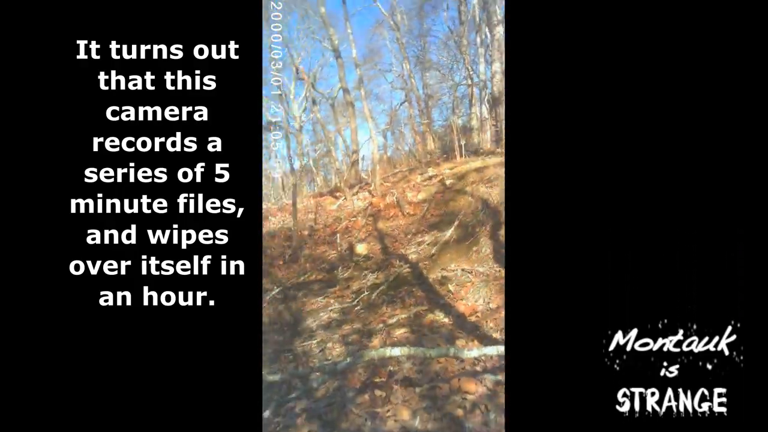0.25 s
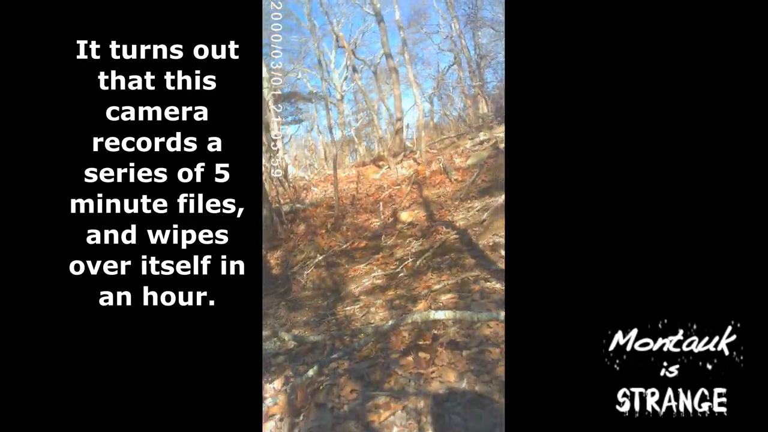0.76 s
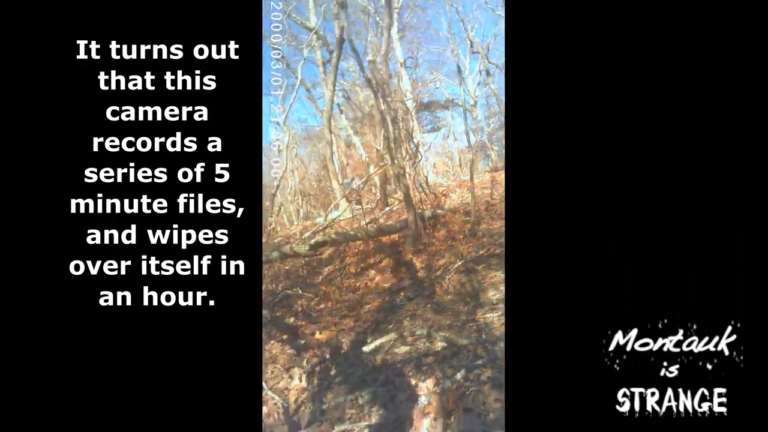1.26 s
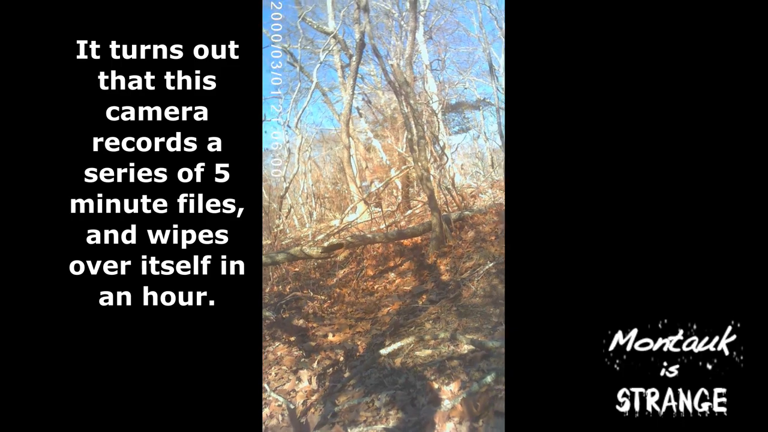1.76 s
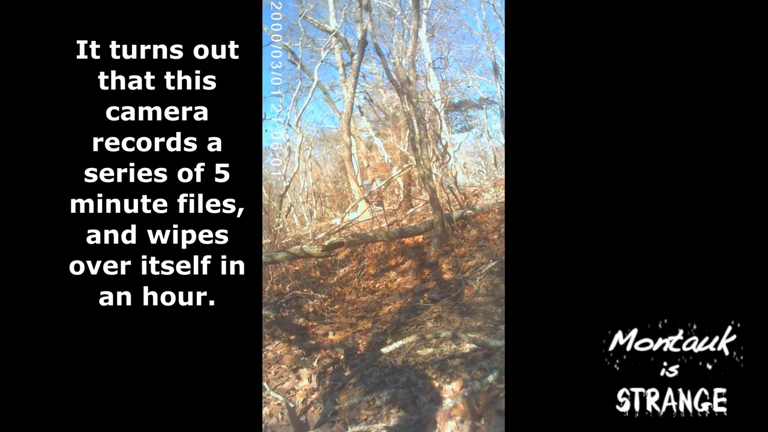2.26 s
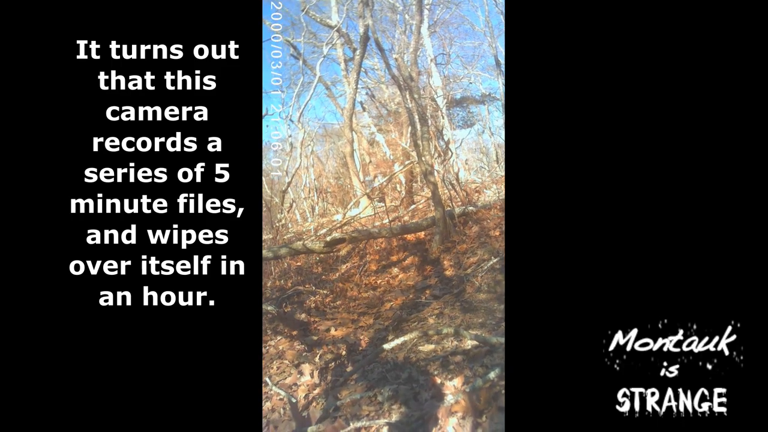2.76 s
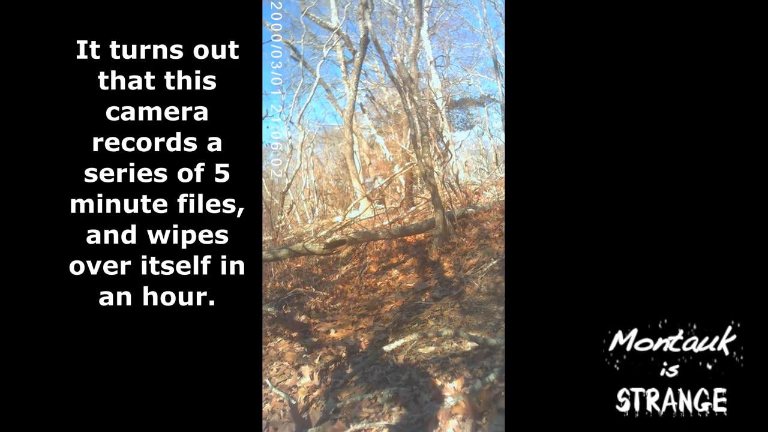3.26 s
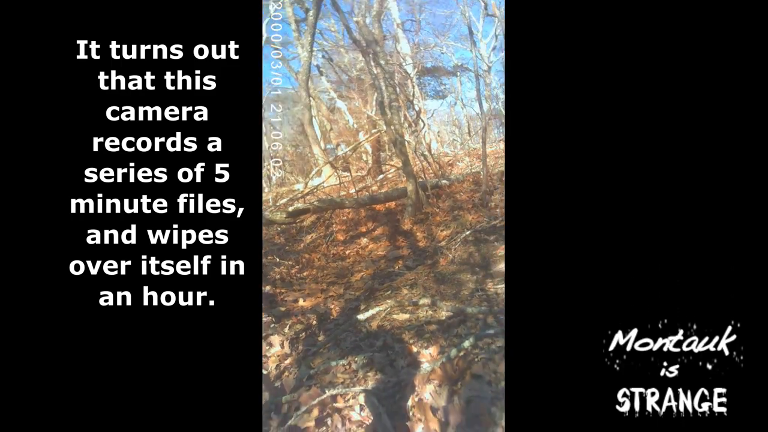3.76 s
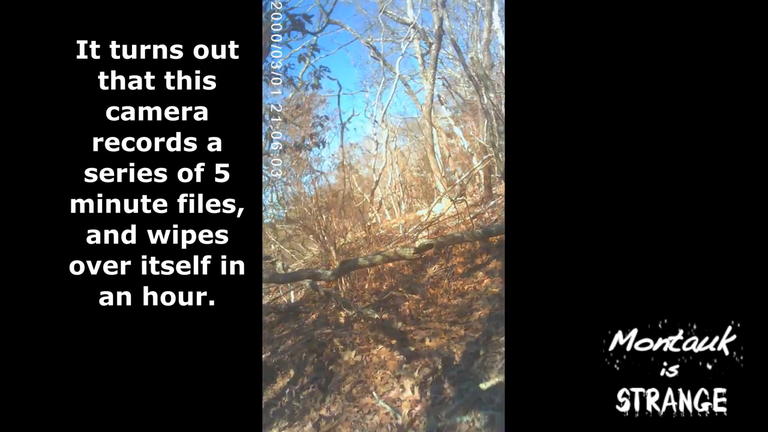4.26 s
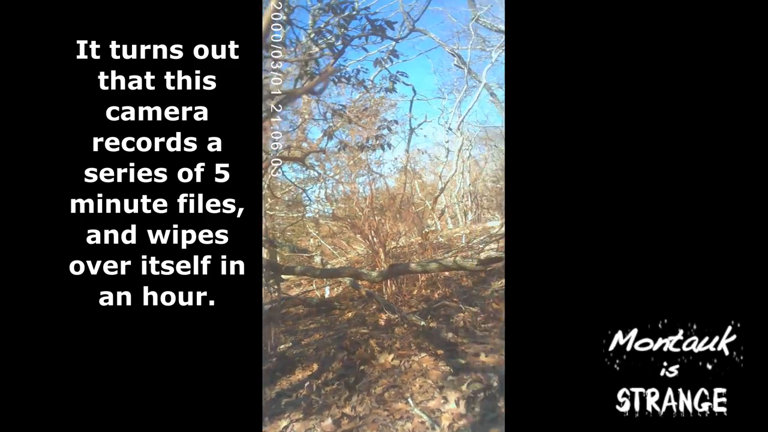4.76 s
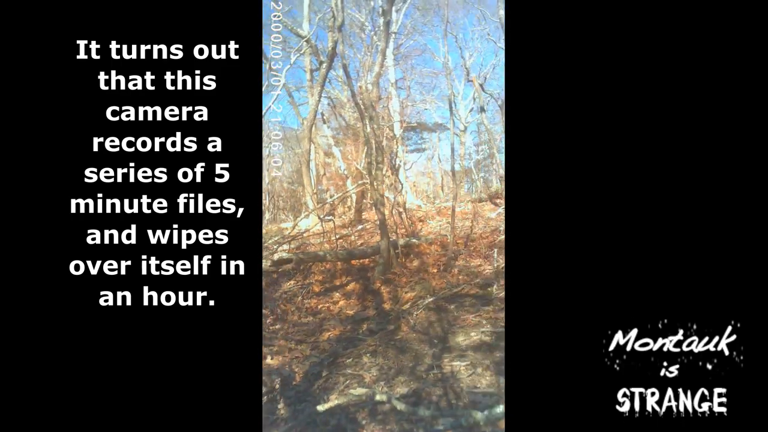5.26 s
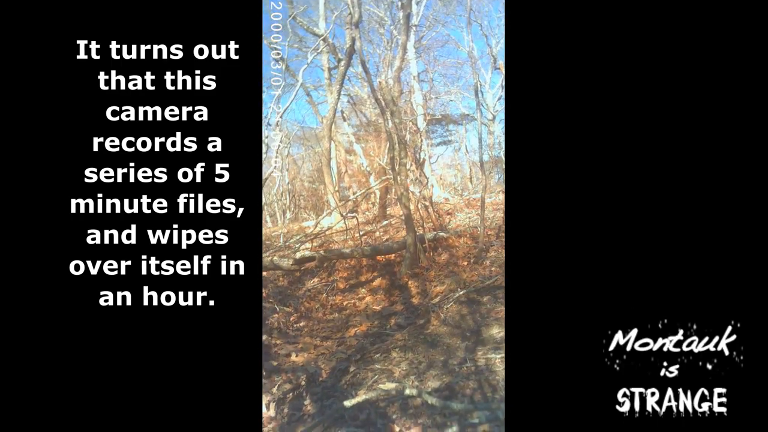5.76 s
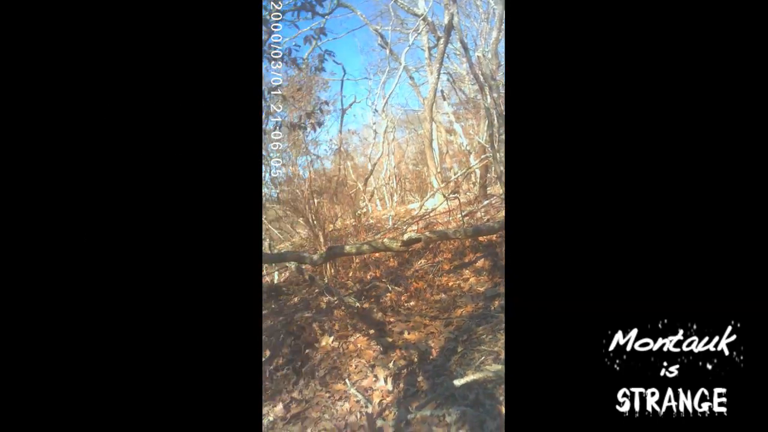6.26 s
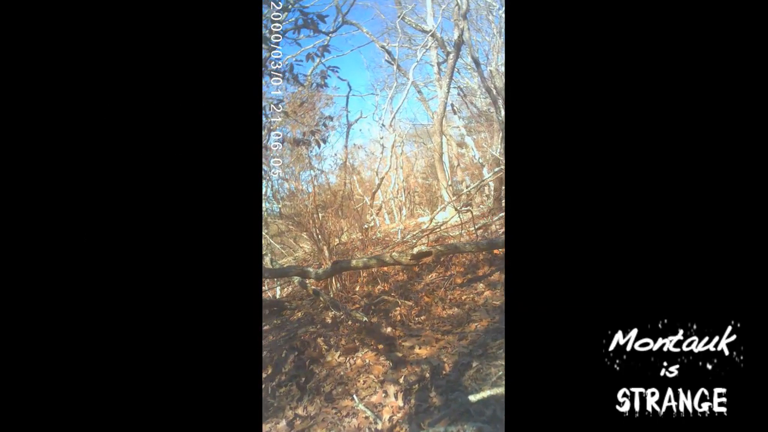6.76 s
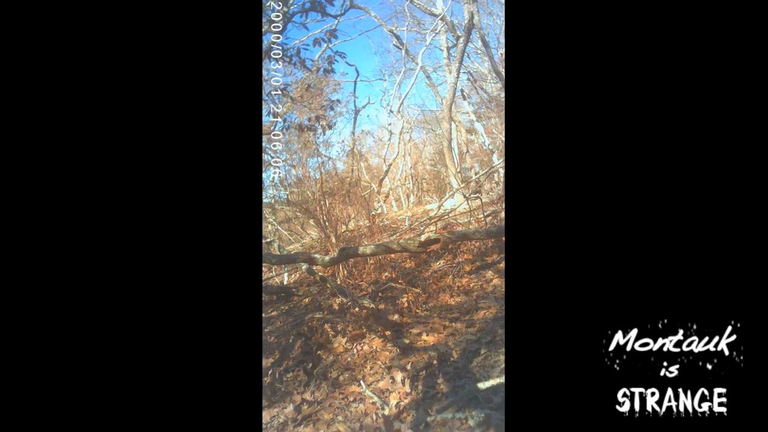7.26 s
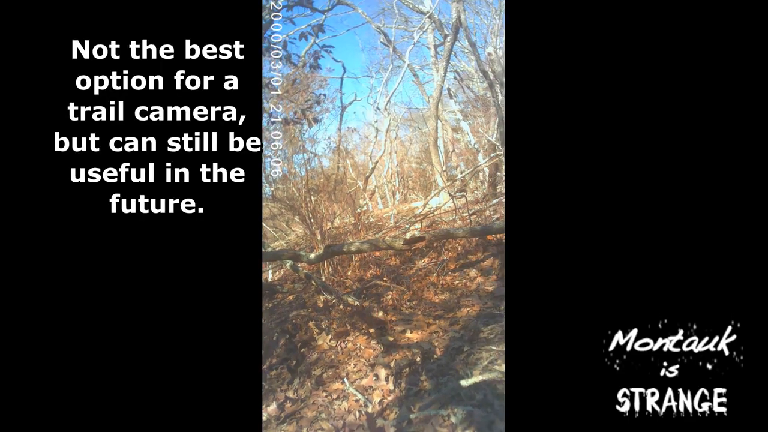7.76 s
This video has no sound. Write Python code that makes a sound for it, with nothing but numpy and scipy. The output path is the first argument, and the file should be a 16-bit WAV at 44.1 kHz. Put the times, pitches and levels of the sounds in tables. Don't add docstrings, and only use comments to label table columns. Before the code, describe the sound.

Close, brittle snaps and leaf rustling on a plastic case thin out, surge into one dense crunch with thuds, then fade to sparse soft rustles.

```python
import sys
import numpy as np
from scipy import signal
from scipy.fft import rfft, irfft, next_fast_len
from scipy.io import wavfile
from scipy.ndimage import uniform_filter1d, map_coordinates

SR = 44100
rng = np.random.default_rng(int(sys.argv[2]) if len(sys.argv) > 2 else 0)


def persist_wave(psi):
    counts = np.round(np.clip(psi, -1, 1) * 32767).astype(np.int16)
    wavfile.write(sys.argv[1], SR, np.atleast_2d(counts).T)


def undo_db(level):
    steps = np.asarray(level, float) / 20
    return 10 ** steps


N = 353549

# centre in Hz, width in Hz, level in dB.
SHELL = [(297.3, 210, 1.5), (640, 724, 1), (857, 250, 0.5), (1350, 910, -1.5)]
FACE = [(2620, 716, 0), (2940, 360, 4.5), (3455, 420, 0), (4284, 730, -4)]
PORT = [(5290, 690, 3), (6495, 1300, -1.5), (6110, 650, -13)]
# time in seconds, pressure in dB, flexing of the shell's top mode in dB.
CRUNCH = [
    (3.788, -48.5, 10),
    (3.825, -35, 9.5),
    (3.93, -27, 4.5),
    (4.04, -23.5, -24.5),
    (4.17, -29, -17.5),
    (4.228, -33, -13),
    (4.236, -40.5, -3),
    (4.33, -53.5, -13),
    (4.38, -59, 7.5),
]


def unit(x):
    return x / np.sqrt(np.mean(x ** 2) + 1e-20)


def along(points, hz):
    f, v = np.transpose(points)
    return np.interp(np.log(hz + 1), np.log(f + 1), v)


def curves(rows):
    s, *cols = np.transpose(rows)
    return [np.interp(np.arange(N) / SR, s, c) for c in cols]


def wobble(rate):
    knots = rng.standard_normal(int(N * rate / SR) + 4)
    return map_coordinates(knots, [np.arange(N) * rate / SR])


def filtered(x, response):
    n = x.shape[-1]
    m = 2 * next_fast_len(n // 2 + 2048)
    return irfft(rfft(x, m) * response(np.fft.rfftfreq(m, 1 / SR)), m)[..., :n]


def placed(s, sounds):
    where = np.round(s * SR).astype(int)[:, None] + np.arange(sounds.shape[1])
    return np.bincount(where.ravel(), sounds.ravel(), N + sounds.shape[1])[:N]


def ring(modes, spread=None):
    sign = -1 if spread is None else 1

    def response(f):
        skirt = (1j * f / modes[0][0]) / (1 + 1j * f / modes[0][0])
        total = 0
        for k, (centre, width, db) in enumerate(modes):
            gain = undo_db(db if spread is None else db + spread[:, k:k + 1])
            mode = 1j * f * width / (centre * centre - f * f + 1j * f * width)
            total = total + sign ** k * gain * mode
        return skirt * total
    return response


def excited(force, modes):
    response = ring(modes)
    power = np.abs(response(np.linspace(0, SR / 2, num=2048))) ** 2
    return filtered(force, response) / np.sqrt(np.mean(power))


def causal(points):
    def response(f):
        fold = irfft(np.log(undo_db(along(points, f))))
        fold[1:len(f) - 1] *= 2
        fold[len(f):] = 0
        return np.exp(rfft(fold))
    return response


def woods():
    # frequency in Hz, spectral density in dB per Hz.
    hum = [(15, -29), (25, 0.5), (233, -2), (1680, -14.5), (3110, -14.5), (6350, -19), (7320, -31),
           (9520, -48), (16100, -120)]
    return undo_db(-70.0) * unit(filtered(rng.standard_normal(N), lambda hz: undo_db(along(hum, hz))))


def grip():
    # time in seconds, level in dB.
    weight = [(.55, -60.5), (.85, -77), (1.1, -55), (1.8, -71), (2.4, -84.5), (3.2, -86), (3.3, -69),
              (3.7, -65.5), (4.1, -56), (4.4, -64), (5.1, -71), (5.5, -67.5), (5.9, -77.5), (6.3, -71.5),
              (6.7, -74.5), (7.2, -74), (7.65, -74.5), (7.8, -71.5)]
    # frequency in Hz, density in dB per Hz.
    thud = [(20, -19), (45, -6.5), (90, -4.5), (160, -4.5), (300, -12), (700, -36)]
    # time in seconds, peak in dB.
    bump_rows = [(0.135, -42), (0.307, -45), (0.348, -37), (0.457, -46.5), (0.916, -58), (1.085, -51),
                 (1.136, -32), (1.268, -33.5), (1.359, -39.5), (3.497, -41.5), (3.827, -39), (3.912, -44),
                 (3.977, -49), (4.038, -34), (4.075, -19.5), (4.106, -28), (4.242, -37.5), (4.3085, -39.5),
                 (3.271, -59), (5.26, -49), (5.503, -54), (7.849, -56), (7.961, -69), (6.344, -56),
                 (6.998, -57), (.7, -48.5), (7.2, -52), (4.999, -61.5), (7.445, -49.5)]
    (level_db,) = curves(weight)
    rumble = unit(filtered(rng.standard_normal(N), lambda hz: undo_db(along(thud, hz))))
    s, db = np.transpose(bump_rows)
    t = np.arange(4096) / SR
    fade = undo_db(db[:, None] - 60 * t / 0.096) * (1 - np.exp(-t / 0.0015))
    bounce_hz = 95 * undo_db(1.5 * rng.standard_normal((len(s), 1)))
    bumps = placed(s, undo_db(-2.0) * fade * np.sin(2 * np.pi * bounce_hz * t))
    lumps = undo_db(level_db + 3.5 * wobble(14))
    return rumble * (lumps + undo_db(-2.5) * placed(s, fade)) + bumps


def catches():
    # middle in seconds, pitch in Hz, peak in dB.
    tones = [(0.1385, 3020, -27.5), (0.205, 1440, -43), (0.206, 583, -43), (0.224, 1400, -51),
             (0.254, 1500, -42.5), (0.353, 1590, -35.5), (0.375, 2790, -27.5), (0.389, 1360, -43),
             (0.556, 5940, -40), (0.558, 2970, -36), (0.68, 5560, -31), (0.686, 2930, -31.5),
             (1.012, 1400, -54), (1.061, 1370, -39), (1.105, 2960, -30), (1.235, 1526, -56),
             (1.2735, 886, -21), (1.2805, 6750, -21), (1.449, 5500, -44), (2.069, 3030, -46.5),
             (3.818, 5970, -42), (3.829, 1300, -50), (3.915, 3790, -28), (3.931, 1280, -30.5),
             (3.959, 1300, -31), (3.976, 4000, -25), (4.013, 870, -30.5), (4.054, 857, -23),
             (4.156, 3830, -34.5), (4.173, 3060, -21.5), (4.194, 880, -31.5), (4.227, 2320, -31),
             (4.526, 1120, -66), (4.529, 2870, -47), (4.553, 2970, -44), (4.611, 2950, -58),
             (4.655, 1280, -57), (4.75, 3050, -52.5), (4.906, 1060, -61), (4.976, 4150, -50),
             (5.507, 2960, -49.5), (5.553, 3000, -57), (5.576, 4400, -56), (5.679, 3230, -53.5),
             (5.944, 2960, -57), (6.042, 1300, -53), (6.168, 2430, -50.5), (6.167, 3170, -49),
             (6.571, 1270, -57), (6.591, 1270, -56.5), (7.275, 1253, -61), (7.293, 1150, -65),
             (7.303, 3000, -53), (7.304, 5470, -49.5), (7.492, 6980, -46), (7.946, 2970, -56)]
    rise_s, fall_s = 0.002, 0.0046
    phase_wander = 0.076
    s, hz, db = np.transpose(tones)[:, :, None]
    t = np.arange(-1024, 1024) / SR
    wander = np.cumsum(rng.standard_normal((len(s), len(t))), axis=1)
    turn = 2 * np.pi * hz * t + phase_wander * wander
    lead = t + rise_s
    swell = np.exp(-.5 * (lead / np.where(lead < 0, rise_s, fall_s)) ** 2)
    return placed(s[:, 0] + t[0], undo_db(db) * swell * np.sin(turn))


def squeaks():
    # time in seconds, pitch in Hz, level in dB, upper partials over it in dB, time in seconds for the
    # fundamental to fall 40 dB.
    stems = [
        (4.972, 1018, -52.5, 7, 0.057),
        (5.15, 1065, -51.5, -4, 0.053),
    ]
    s, hz, db, upper_db, t60 = np.transpose(stems)[:, :, None]
    t = np.arange(4096) / SR
    wander = np.cumsum(rng.standard_normal((len(s), len(t))), axis=1)
    turn = 2 * np.pi * hz * t + 0.038 * wander
    stack = 0
    for k in (1, 2, 4, 5):
        partial_db = upper_db * (k > 1) - 5 * (k == 2) - 40 * t * np.sqrt(k) / t60
        stack = stack + undo_db(partial_db) * np.sin(k * turn)
    return placed(s[:, 0], undo_db(db) * stack * (1 - np.exp(-t / 0.0024)))


def blows():
    # time in seconds, peak in dB, knock and bright edge in dB over peak.
    twigs = [(.0074, -11, -14, 7), (0.135, -9, 3.5, -13.5), (0.2033, -17.5, -13, -18.5),
             (0.3079, 5.5, -22.5, -17.5), (0.3126, -10, 1.5, 4), (0.3502, -8.5, -26, 4),
             (0.357, -14.5, -29, 3.5), (0.372, -14.5, -29, -19), (0.5328, -14.5, -38, 5.5),
             (0.9323, -22, -5.5, 7.5), (1.0751, -16.5, -1.5, -17.5), (1.137, -8, -0.5, -6),
             (1.1484, -15, -2, 10), (1.2717, 1.5, 2, 2), (1.5974, -21, -20, 1), (3.502, -4, -12.5, 4.5),
             (4.044, -12, -9, 10.5), (4.079, -16.5, 6, -13.5), (4.085, -0.5, 3, 14),
             (4.1183, -12.5, 1, 13.5), (4.131, -17.5, -11, -9), (4.251, -14, -23, 7), (4.26, -13, -26, 4.5),
             (4.2752, -15.5, -31, 7), (4.3182, -21.5, -25, 9.5), (4.4273, -19.5, -24, -9),
             (5.293, -21, -8.5, -1.5), (6.421, -39, 14.5, -23), (7.458, -24, -41, 12),
             (7.4914, -20.5, -15.5, -4)]
    # time in seconds, peak in dB.
    ticks = [(.0738, -24.5), (.0857, -21.5), (.1078, -30), (.1581, -31.5), (.246, -15.5), (.4541, -20.5),
             (.4894, -22.5), (.7017, -21.5), (.962, -30.5), (1.173, -23.5), (1.3254, -19.5),
             (1.5682, -26.5), (1.658, -25), (1.6669, -24.5), (1.7702, -25.5), (1.8258, -26.5),
             (1.9307, -28.5), (2.3073, -29.5), (2.7754, -36.5), (3.3007, -29), (4.2813, -19), (4.3233, -23),
             (4.499, -25), (4.8422, -29.5), (6.4782, -30), (7.089, -37.5), (7.3305, -28), (6.1748, -34.5),
             (.5295, -30), (7.137, -40.5)]
    cracks = [(.0273, -22.5), (.0432, -24), (.0964, -23), (.458, -22.5), (1.0094, -38.5), (1.216, -33),
              (1.3525, -19.5), (1.41, -20.5), (1.4155, -24), (1.472, -24), (1.5021, -23), (1.544, -23.5),
              (1.6717, -27.5), (1.966, -32), (1.9948, -29.5), (2.1244, -31.5), (2.2114, -31), (2.3833, -29),
              (2.397, -30), (2.8568, -30.5), (3.4759, -20.5), (3.5701, -24), (3.6044, -23), (3.7026, -30),
              (3.7083, -29), (4.305, -21), (4.3906, -28), (4.67, -32.5), (6.0485, -25.5), (7.1216, -26.5)]
    taps = [(.4006, -25), (.73, -37), (.765, -41), (.9463, -38), (1.6756, -33), (1.1038, -35), (1.179, -22),
            (1.2083, -21), (1.3832, -26.5), (1.8005, -35.5), (1.946, -43), (2.0646, -41), (2.0837, -45),
            (2.109, -30.5), (2.52, -38), (2.889, -34), (3.3521, -33.5), (3.545, -42.5), (3.5887, -27.5),
            (3.667, -49), (4.414, -29.5), (4.4676, -36), (5.1503, -38), (5.228, -32.5), (5.5055, -35),
            (5.6554, -37), (6.0381, -36), (6.2917, -38.5), (6.9476, -38), (5.2985, -33.5)]
    knocks = [(.0165, -36), (.742, -49), (1.0274, -36), (1.3998, -37.5), (1.905, -53.5), (2.66, -52.5),
              (2.972, -47.5), (3.985, -22), (5.239, -45), (5.257, -47), (5.36, -47.5), (6.081, -44.5),
              (6.3443, -48.5), (7.42, -41.5), (7.53, -48)]
    # time in seconds, peak
    # in dB, bright edge in dB over peak.
    splinters = [(0.0317, -33, -11), (0.0592, -30, 3), (0.1415, -19, -4), (0.1745, -25, 3),
                 (0.2275, -34.5, 0), (0.271, -42, -1), (0.3416, -33, -1), (0.6262, -27, -2),
                 (0.7095, -56, -4), (0.7243, -40, -14), (0.7348, -49, -20), (0.8005, -44, -4),
                 (0.8672, -44, -4), (0.8899, -43, -13), (0.9176, -49, -15), (0.9732, -54, -3),
                 (1.0032, -43, 4), (1.051, -26, -14), (1.0868, -18.5, -19), (1.093, -19.5, -17),
                 (1.1203, -30.5, -12.5), (1.2627, -20, -1), (1.2867, -25.5, -2), (1.315, -41, 0),
                 (1.3621, -26, -2), (1.4242, -32.5, 7), (1.4695, -25, -9), (1.508, -34, -3),
                 (1.534, -25.5, -17), (1.5497, -24, -7), (1.604, -40, 8), (1.6885, -39, -13),
                 (1.7893, -39.5, -14), (1.988, -42, -11), (2.003, -36, -7), (2.006, -44, -9),
                 (2.0132, -50, -23), (2.022, -45, -5), (2.1017, -51.5, -12), (2.1469, -33, -11),
                 (2.183, -39, -12), (2.245, -46, -15), (2.25, -41, -11), (2.2681, -46, -3),
                 (2.285, -42, 10), (2.3347, -49, 21), (2.376, -34, -14), (2.5272, -36, -12),
                 (2.536, -39, -16),
                 (2.846, -41, -12), (2.852, -32.5, -23), (2.9487, -40.5, 3.5), (3.056, -46, -13.5),
                      (3.1577, -47, 11), (3.1914, -43.5, -2), (3.2158, -42, 0), (3.3378, -49, -15),
                      (3.3416, -37.5, -23), (3.3663, -40, -11), (3.428, -47, -15), (3.4508, -46, -5),
                      (3.4892, -20.5, -11), (3.4935, -16, 11), (3.6393, -35, -15), (3.6544, -45, -12),
                      (3.7413, -40, -10), (3.8443, -16.5, -14), (3.8564, -21.5, 12), (3.879, -21.5, -8),
                      (3.936, -12.5, -15), (3.9446, -21.5, -12), (3.9621, -9, -13), (3.9907, -16.5, -10),
                      (4.02, -13, -15), (4.047, -5, 0), (4.082, -8, 0), (4.094, -9.5, 6), (4.1052, -5.5, 8),
                      (4.115, -8.5, -3), (4.1282, -9.5, 4), (4.1398, -20.5, 9), (4.1481, -16, -7),
                      (4.1705, -19.5, -12), (4.287, -23.5, -11), (4.329, -27, 6), (4.345, -31.5, -4),
                      (4.4045, -29.5, -2), (4.457, -31.5, -7), (4.4948, -32, 6), (5.225, -52, -7.5),
                      (5.309, -51, -8), (5.315, -45, -5.5), (6.103, -70, 3.5), (6.122, -46, 6),
                      (6.1608, -43, -16), (6.2805, -41.5, -20.5), (6.449, -46, -13), (6.51, -45, -11),
                      (6.6845, -44.5, -5), (6.6956, -42, -18.5), (6.704, -45, -11.5), (6.9333, -40, -4.5),
                      (6.9565, -39.5, -1), (7.8143, -44, -14.5)]
    middle_s, gap_s, middle_db, sag_db = 7.6858, 0.027, -38.5, 2.5
    ratchet = [(middle_s + k * gap_s, middle_db - abs(k) * sag_db) for k in range(-2, 3)]
    # knock and bright edge, dB over peak
    kinds = [(ticks + ratchet, (-18.5, 2.5)), (cracks, (-5, 0)), (taps, (-1.5, -14)), (knocks, (13, -4))]
    rows = list(twigs)
    for kind, colour in kinds:
        rows += [(s, db, *colour) for s, db in kind]
    rows += [(s, db, -10, edge_db) for s, db, edge_db in splinters]
    return np.transpose(rows)


def stroked(rows):
    power = np.zeros(N)
    for s, length, first_db, slide_db in rows:
        way = np.arange(round(length * SR)) / (length * SR)
        part = power[round(s * SR):][:len(way)]
        part += undo_db(first_db + slide_db * way[:len(part)]) ** 2
    return power


def strokes():
    # start in seconds, length in seconds, first level in dB, slide in dB.
    brushes = [(0, 0.045, -39.5, -21.5), (0.054, 0.1, -48, -8), (0.135, 0.087, -36, -8.5),
               (0.225, 0.031, -43, 2.5), (0.33, 0.024, -56.5, 13.5), (0.369, 0.16, -40, -20),
               (0.45, 0.064, -43.5, 3), (.515, 0.059, -56.5, 13), (.546, 0.029, -40.5, -7),
               (.591, 0.039, -40.5, -12.5), (0.638, 0.058, -45, 11), (0.726, 0.018, -42, -32.5),
               (1.04, 0.01, -50.5, 7), (1.051, 0.045, -39.5, 5.5), (1.1, 0.0077, -31, 0.5),
               (1.13, 0.071, -52.5, -4.5), (1.207, 0.035, -36, -24), (1.25, 0.024, -53, 35),
               (1.2735, 0.0057, -14, -6.5), (1.284, 0.093, -48, 1.5), (1.385, 0.182, -50.5, -1.5),
               (1.612, 0.02, -60, 0.5), (1.7, 0.058, -56, 1.5), (1.76, 0.055, -60, -14),
               (1.819, 0.036, -44.5, -26), (1.999, 0.096, -62, -19), (2.058, 0.172, -54.5, -8.5),
               (2.23, 0.2, -60.5, 1), (3.49, 0.013, -33.5, 2.5), (3.502, 0.022, -30.5, -9.5),
               (3.524, 0.26, -50.5, -14.5)]
    slides = [(2.411, 0.085, -64.5, 0), (2.5, 0.11, -61, -13), (3.241, 0.056, -80, 4), (4.38, 0.2, -51, 1),
              (4.581, 0.074, -56, -34.5), (4.637, 0.12, -58.5, -2), (4.881, 0.048, -63, -4.5),
              (4.974, 0.0224, -50, -36.5), (5.08, 0.018, -70, -12), (5.187, 0.135, -66, -1.5),
              (5.397, 0.06, -56.5, -6.5), (5.491, 0.049, -55.5, -7), (5.548, 0.115, -55, -2),
              (5.66, 0.111, -57.5, -14.5), (5.818, 0.3, -66.5, 8), (6.138, 0.044, -62, 8),
              (6.202, 0.083, -68, 4), (6.322, 0.067, -62, -8), (6.453, 0.2, -62.5, -11),
              (6.553, 0.076, -55.5, -4), (6.664, 0.11, -59.5, -18.5), (6.764, 0.11, -62, -3.5),
              (6.898, .17, -65, 3.5), (7.126, 0.21, -63, 10), (7.339, 0.15, -62, 12),
              (7.477, 0.16, -58.5, -6), (7.947, 0.067, -62.5, -17.5)]
    # time in seconds, resting level, nearness to the port, weight on the shell in dB.
    contact = [(0, -58, -2, -5.5), (.4, -65, -5.5, -4), (.6, -56.5, -5, -14), (.75, -70.5, -4, -4),
               (1.05, -70, -5.5, -9), (1.25, -70.5, -7.5, 2.5), (1.5, -78.5, 2, -7.5),
               (1.9, -89.5, -6.5, -6), (2.6, -74.5, -0.5, -3.5), (3, -66.5, 0, -7.5),
               (3.78, -73.5, -5.5, -2.5), (3.9, -64, -4, -12.5), (4.1, -66.5, -5, 0), (4.8, -80, -11, -8),
               (5.4, -85.5, -9, -1.5), (6.3, -75.5, -8, -7), (7.09, -87.5, -7, -4.5), (7.8, -69, -9, -7.5)]
    slide_soft_s = 0.013
    trail_db, trail_t60_s = -28, 0.063
    t = np.arange(N) / SR
    rest_db, edge_db, shell_db = curves(contact)
    pushing = (t > CRUNCH[0][0]) * (t < CRUNCH[-1][0])
    power = undo_db(rest_db) ** 2 + undo_db(curves(CRUNCH)[0]) ** 2 * pushing
    power += stroked(brushes)
    power += np.abs(uniform_filter1d(stroked(slides), round(slide_soft_s * SR)))
    s, db = blows()[:2]
    power += placed(s, undo_db(db[:, None] + trail_db - 60 * t[:4096] / trail_t60_s) ** 2)
    face_db = uniform_filter1d(10 * np.log10(power), size=88)
    return face_db, face_db + edge_db, face_db + shell_db


def grains(per_second, size_db, hiss, rarest=0.022):
    chance, size = rng.random((2, N))
    slips = (chance < per_second / SR) * undo_db(-size_db * np.log(size + rarest)) * rng.standard_normal(N)
    return unit(slips) + hiss * rng.standard_normal(N)


def patchy(x, depth_db):
    z = signal.stft(x, nperseg=256)[2]
    field = uniform_filter1d(rng.standard_normal(z.shape), size=5, axis=0)
    field = uniform_filter1d(field, size=14, axis=1)
    return signal.istft(z * undo_db(depth_db * unit(field)), nperseg=256)[1][:N]


def dipped(x):
    # centre in Hz, width in Hz, share removed from 0 to 1.
    dips = [(1754, 84, 1), (1875, 170, 1), (4930, 170, 0.18)]

    def response(f):
        total = 1
        for hz, width, share in dips:
            band = 1j * f * width / (hz ** 2 - f * f + 1j * f * width)
            total = total * (1 - np.clip(share, 0, 1) * band)
        return total
    return filtered(x, response)


def drag():
    # centre in Hz, width in Hz, level in dB.
    soft_shell = [(333, 140, 5), (1250, 210, 4.5)]
    soft_face = [(2950, 470, 8.5), (4040, 1340, -0.5)]
    soft_port = [(5160, 870, 6), (6300, 1900, -4.5)]
    flex = [(1300, 270, 0)]
    heavy_db = -35
    t = np.arange(N) / SR
    face_db, port_db, shell_db = strokes()
    settled = t > 4.45
    pressed = 1 / (1 + undo_db(-1.5 * (face_db + 64.0)))
    pressed = pressed * (1 - 0.42 * settled)
    heavy = 1 / (1 + undo_db(-2.5 * (uniform_filter1d(face_db, size=2000) - heavy_db)))

    crush = grains(per_second=2800, size_db=2.8, hiss=.6) * undo_db(1.6 * wobble(70))
    slips = grains(per_second=1400, size_db=3, hiss=.65) * undo_db(2.2 * wobble(110))
    ticks = grains(per_second=220, size_db=3, hiss=1.6, rarest=.05)
    slips = np.sqrt(1 - heavy) * unit(slips) + np.sqrt(heavy) * unit(crush)
    slips = np.sqrt(pressed) * unit(patchy(slips, depth_db=2.0))
    slips = slips + np.sqrt(1 - pressed) * ~settled * unit(ticks)
    whisper = grains(per_second=830, size_db=4.5, hiss=1.8, rarest=0.039) * undo_db(3.4 * wobble(18))
    whisper = np.sqrt(1 - pressed) * settled * unit(patchy(whisper, depth_db=4.5))

    sound = excited(slips * undo_db(port_db), PORT)
    sound += excited(whisper * undo_db(port_db + 6.0 + 0.23 * (face_db + 62)), soft_port)
    sound += excited(slips * undo_db(face_db), FACE)
    sound += excited(whisper * undo_db(face_db), soft_face)
    sound += excited(heavy * slips * undo_db(face_db - 16.5), FACE[2:])
    flex_db = curves(CRUNCH)[1] * (np.abs(t - 4.06) < .28) - 3.5
    sound += excited(slips * undo_db(shell_db - 8), SHELL[:3])
    sound -= excited(slips * undo_db(shell_db + flex_db - 6.0), flex)
    sound += excited(whisper * undo_db(shell_db - 1.5), soft_shell)
    return dipped(sound)


def snaps():
    # centre in Hz, width in Hz, level in dB.
    shove = [(450, 3400, 0)]
    deaden = 1.4
    lean = 0.42
    s, db, knock_db, edge_db = blows()
    t = np.arange(1024) / SR
    draw = rng.standard_normal((len(s), len(t) + 16))
    life_s = 0.011 * undo_db(np.clip(0.5 * draw[:, -1:], -3, 3))
    crack = 0.15 * draw[:, :len(t)] * undo_db(-60 * t / life_s)
    crack[:, 0] = np.sign(draw[:, 0])
    clean = crack * np.where(t > 0, .5, 1)
    shell = [(hz, deaden * width, level) for hz, width, level in SHELL]

    def peaked(part, level_db):
        return part / np.abs(part).max(axis=1, keepdims=True) * undo_db(level_db)[:, None]

    registers = [(FACE, crack, db - 3.0), (PORT, crack, db + edge_db - 6.5),
                 (shell, clean, db + knock_db - 8.0), (shove, clean, db + knock_db - 9.0)]
    sound = np.zeros_like(crack)
    for k, (modes, force, level_db) in enumerate(registers):
        lean_db = (modes is FACE) * lean * edge_db[:, None] * (np.arange(4) - 1.5)
        scatter_db = 2.0 * draw[:, len(t) + 4 * k:][:, :4]
        sound += peaked(filtered(force, ring(modes, lean_db + scatter_db)), level_db)
    spike = filtered(clean, ring([(200, 15000, 0)]))
    sound += peaked(spike, db - 4.5 + 0.44 * edge_db)
    return placed(s + .0006, sound * np.cos(np.pi / 2 * t / t[-1]))


def scene():
    return (woods() + grip() + catches() + squeaks() + drag() + snaps())[None]


def top_cut(x):
    return signal.sosfilt(signal.butter(12, 9400, fs=SR, output="sos"), x)


def record(dry):
    # frequency in Hz, gain in dB.
    band_edge = [(1450, 2.5), (1850, 5.5), (2250, 2), (6900, -1), (7200, -18), (7500, -34), (8200, -68),
                 (8900, -36), (9500, -80)]
    held = dry / (1 + np.abs(dry / .6) ** 4) ** (1 / 4)
    return top_cut(filtered(held, causal(band_edge)))


dry = scene()
out = record(dry)
persist_wave(out)
```